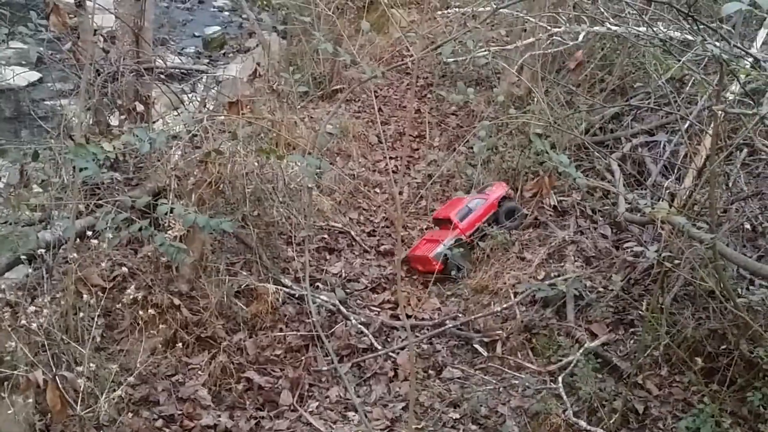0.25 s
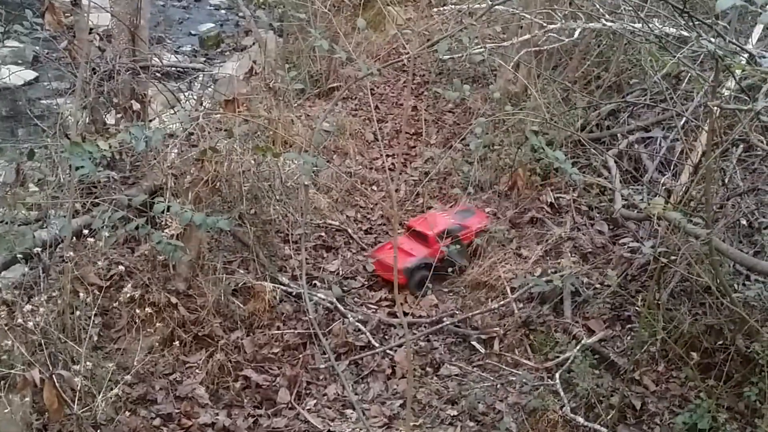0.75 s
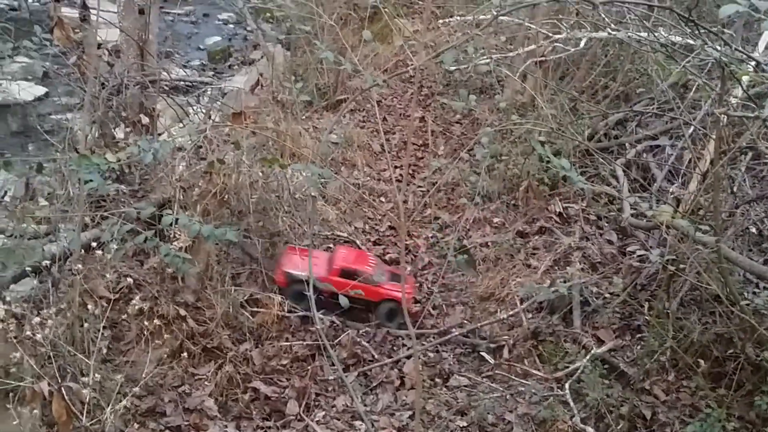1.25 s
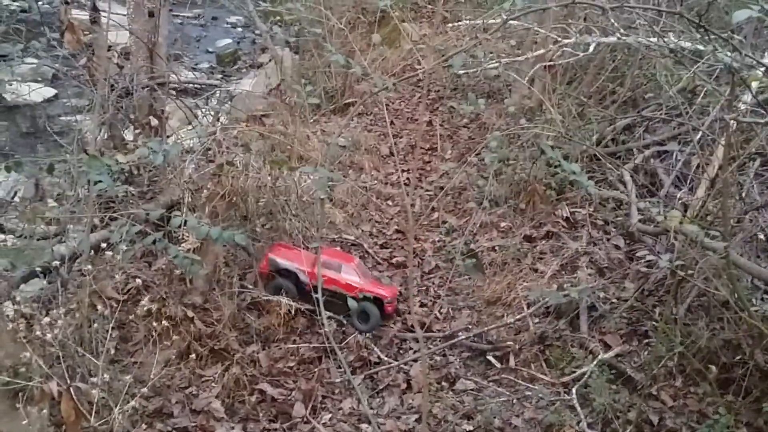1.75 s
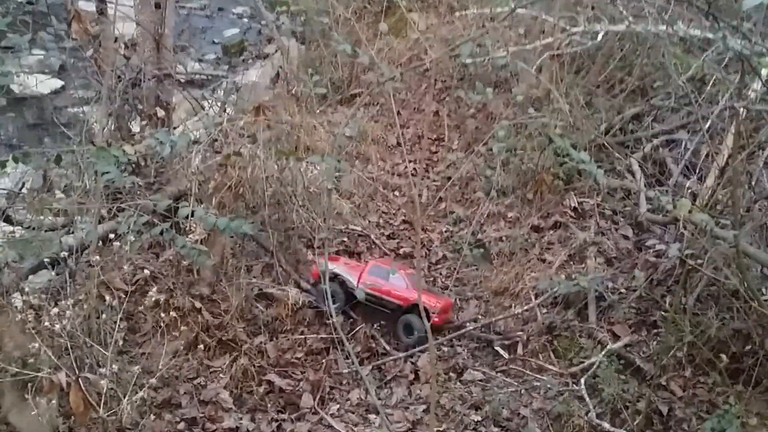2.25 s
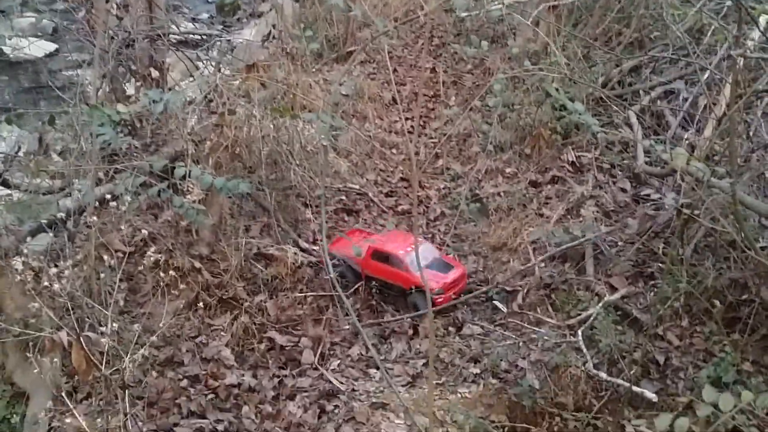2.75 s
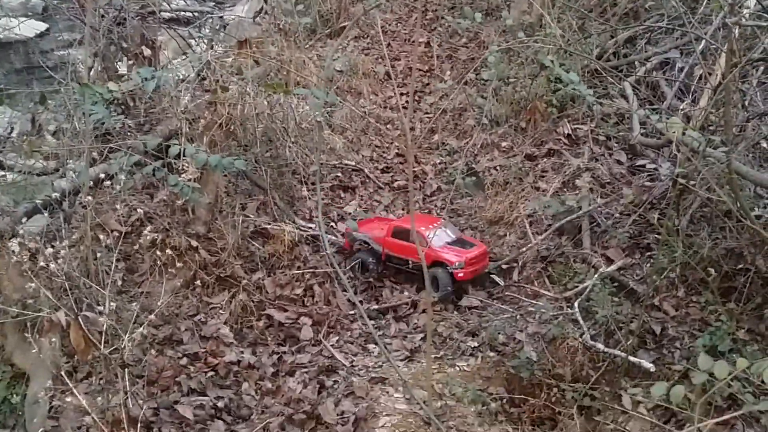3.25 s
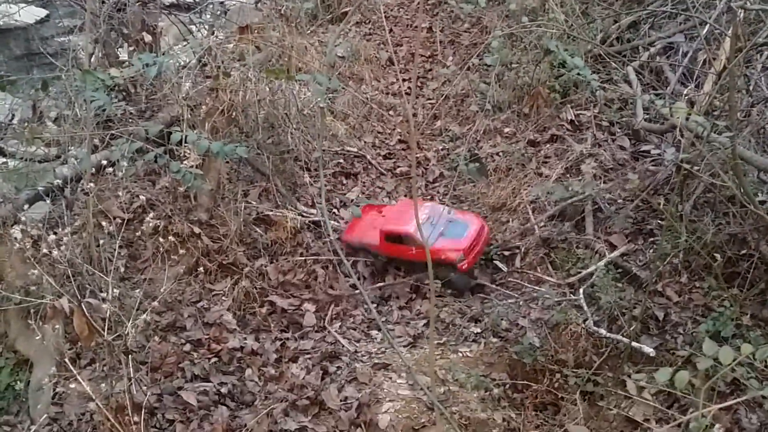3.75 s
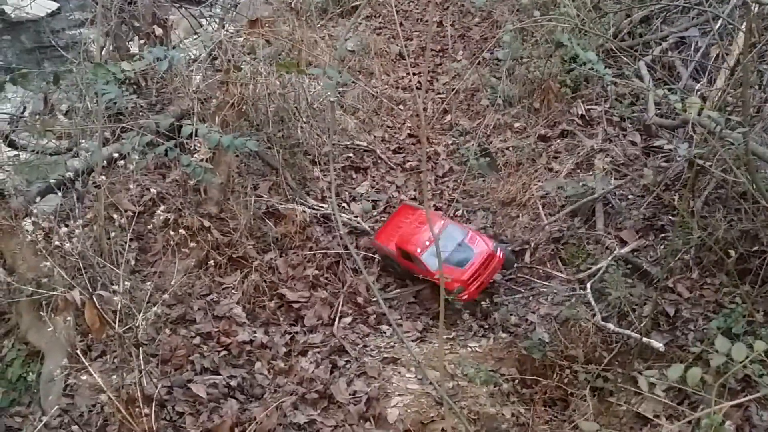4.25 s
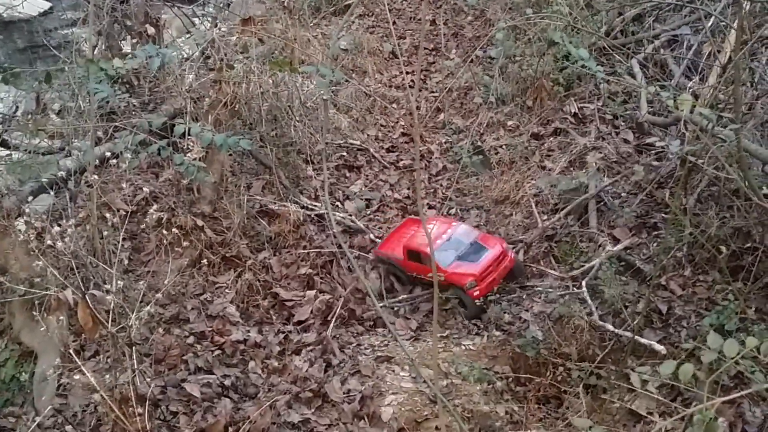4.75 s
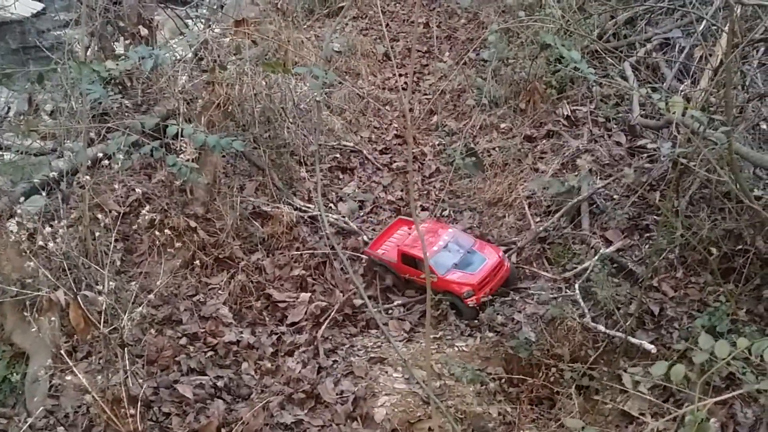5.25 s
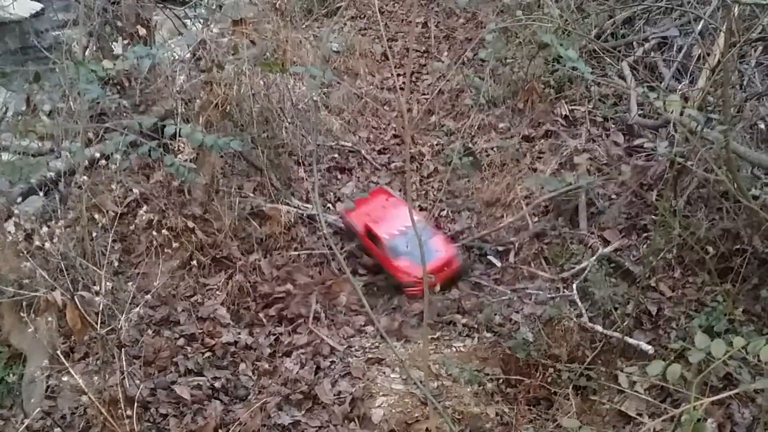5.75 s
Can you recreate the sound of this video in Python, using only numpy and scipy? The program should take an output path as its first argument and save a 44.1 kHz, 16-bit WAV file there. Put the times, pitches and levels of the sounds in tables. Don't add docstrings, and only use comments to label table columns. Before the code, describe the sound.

Bursts of brittle leaf crunch start and stop as a toy truck pulls, pauses and pulls again. Its gears whine upward early on and shriek briefly later. Twigs break with bright dry cracks, sticks knock woodily, and rubber treads stutter against the hollow shell, which booms low. Close, dry stereo pickup in open woodland, with very quiet distant traffic and stream hiss beneath, and the busiest jolts at the end.

```python
import sys
import numpy as np
from scipy import signal
from scipy.fft import rfft, irfft
from scipy.io import wavfile

SR = 44100
rng = np.random.default_rng(int(sys.argv[2]) if len(sys.argv) > 2 else 0)


def nominal_scale(level):
    x = np.asarray(level, float) / 20
    return 10 ** x


def file_out(sig):
    cols = np.atleast_2d(sig).T
    lim = np.clip(cols, -1, 1)
    pcm = np.round(lim * 32767).astype(np.int16)
    wavfile.write(sys.argv[1], SR, pcm)


N = 264589
SNAP_RISE_S = 0.00015


def rms_one(x):
    return x / np.sqrt(np.mean(x ** 2) + 1e-20)


def at_hz(points, hz):
    table_hz, values = np.array(points)[:, 0], np.array(points)[:, 1]
    return np.interp(np.log(hz), np.log(table_hz), values)


def cut(x, hz, kind):
    return signal.sosfilt(signal.butter(2, hz, kind, fs=SR, output="sos"), x)


def drift(rate_hz):
    r = np.exp(-80 * np.pi * rate_hz / SR)
    slow = signal.lfilter([1], [1, -2 * r, r * r], rng.standard_normal(N // 40 + 2002))[2000:]
    return np.interp(np.arange(N) / 40, np.arange(len(slow)), rms_one(slow))


def ring(clicks, hz, t60_s):
    r, w = nominal_scale(-60 / (t60_s * SR)), 2 * np.pi * hz / SR
    return signal.lfilter([0, np.sin(w)], [1, -2 * r * np.cos(w), r * r], clicks + 1e-18)


def peaking(x, lifts):
    for hz, width_hz, db in lifts:
        w, a = 2 * np.pi * hz / SR, nominal_scale(db / 2)
        k = np.sin(w) * width_hz / hz / 2
        x = signal.lfilter([1 + k * a, -2 * np.cos(w), 1 - k * a],
                           [1 + k / a, -2 * np.cos(w), 1 - k / a], x)
    return x


def grains(per_s, spread_db, clump_db):
    sizes = nominal_scale(spread_db * np.minimum(rng.exponential(1, N), 4)) * rng.choice([-1, 1], N)
    starts = rng.exponential(1, N) * (rng.random(N) < 110 / SR)
    fading = signal.lfilter([1], [1, -np.exp(-1 / (0.009 * SR))], starts)
    return sizes * nominal_scale(clump_db * np.minimum(fading, 2)) * (rng.random(N) < per_s / SR)


def strike(clicks, modes, patchy_db):
    dealt = rng.integers(0, len(modes), (3, N))
    total = np.zeros((3, N))
    for k, (hz, db, t60_s) in enumerate(modes):
        flare = nominal_scale(db + patchy_db * drift(17))
        total += ring(flare * clicks * (dealt == k), hz, t60_s)
    return rms_one(total)


def contact(length_s, rise_s, count):
    t = np.arange(1500) / SR
    ragged = rng.exponential(1, (count, 1, len(t) // 30)).repeat(30, axis=2)
    fade = np.exp(-t / length_s) + 0.1 * ragged * np.exp(-t / 0.008)
    slips = rng.standard_normal((count, 3, len(t))) * fade * (1 - np.exp(-t / rise_s))
    return slips / np.sqrt(np.sum(slips ** 2, axis=2, keepdims=True))


def add(track, start_s, sound):
    i = round(start_s * SR)
    track[:, i:i + sound.shape[1]] += sound[:, :N - i]


def pair(versions, lag, own_db, own_above_hz):
    shared, own = versions[0], versions[1:]
    direct = np.array([shared, np.interp(np.arange(N) - lag, np.arange(N), shared)])
    return direct + nominal_scale(own_db) * signal.lfilter(*signal.butter(1, own_above_hz, "high", fs=SR), own)


def woods():
    # hz, density_db (per Hz)
    floor = [(22, -33), (40, -24), (70, 0.5), (110, -0.5), (200, -13.5), (400, -26), (1000, -27),
             (1800, -56), (4000, -47), (9000, -40), (15000, -27.5)]
    hz = np.maximum(np.arange(N // 2 + 1) * SR / N, 1)
    mid, side = rfft(rng.standard_normal((2, N)), axis=1) * nominal_scale(at_hz(floor, hz))
    alike = 0.83 / (1 + (hz / 1600) ** 2) / (1 + (18 / hz) ** 2)
    both = np.sqrt(1 + alike) * mid + np.sqrt(1 - alike) * side * [[1], [-1]]
    both *= nominal_scale([[1.5], [-1.5]])
    return nominal_scale(-48) * rms_one(irfft(both, N, axis=1))


def motor():
    # start_s, mesh_hz, level_db
    pulls = [
        [(.46, 582, -49), (.575, 915, -49), (.67, 1210, -39), (.78, 1640, -40), (.805, 1950, -35),
         (.85, 2110, -49.5), (.9, 2750, -35.5), (.935, 2690, -40)],
        [(1.08, 2610, -32), (1.14, 2650, -44.5), (1.19, 2800, -37), (1.22, 2596, -34), (1.26, 2410, -47),
         (1.33, 2430, -51)],
        [(4.525, 4750, -31), (4.555, 5220, -32)],
        [(4.628, 4900, -23), (4.643, 5110, -22), (4.66, 4950, -33)],
        [(5.15, 2510, -37), (5.185, 2590, -40), (5.21, 2750, -43), (5.24, 2820, -38), (5.285, 2730, -40),
         (5.32, 2620, -57)],
        [(5.03, 705, -34), (5.06, 1055, -34.5), (5.09, 1350, -42)],
        [(5.06, 2700, -39), (5.085, 3070, -32), (5.12, 3200, -36)],
        [(5.33, 1470, -46), (5.37, 1033, -42.5), (5.4, 646, -40)],
        [(1.12, 4550, -40), (1.17, 4460, -32), (1.19, 4430, -36)],
        [(5.475, 827, -32), (5.515, 860, -42.5), (5.545, 1050, -41)],
    ]
    # mode_hz, width_hz
    cover = [(620, 180), (910, 370), (1225, 46), (1640, 86), (2000, 340), (2420, 120), (2700, 780),
             (4070, 130), (4460, 200), (5000, 190)]
    octave_db, off_mode_db = -2, -18
    out = np.zeros((3, N))
    waver, flicker = 1 + 0.014 * drift(80), nominal_scale(5 * drift(45) - 3)
    for s, hz, db in map(np.transpose, pulls):
        on = np.arange(round(s[0] * SR), round(s[-1] * SR))
        t = on / SR
        ends = np.clip(np.minimum(t - s[0], s[-1] - t) / 0.013, 0, 1)
        level = nominal_scale(np.interp(t, s, db)) * ends * flicker[on]
        hz = np.interp(t, s, hz)
        for k, share_db in enumerate([0, octave_db if hz.max() > 1500 else -40], 1):
            near = sum(1 / (1 + (2 * (k * hz - mode_hz) / width_hz) ** 2) ** 2 for mode_hz, width_hz in cover)
            turns = k * np.cumsum(hz * waver[on]) / SR
            out[0, on] += nominal_scale(share_db) * level * (near + nominal_scale(off_mode_db)) * np.sin(2 * np.pi * turns)
    hum_hz, hum_width_hz, hum_db = 990, 40, -60
    out[0] += nominal_scale(hum_db) * rms_one(ring(rng.standard_normal(N), hum_hz, 2.2 / hum_width_hz))
    return out


def chassis(rattle_db):
    # mode_hz, level_db, t60_s
    frame_modes = [(557, 4, 0.011), (948, 6, 0.008), (1272, 4, 0.01), (1633, -3, 0.037),
                   (2170, -3.5, 0.0055), (2680, 0.5, 0.019)]
    taps = grains(1500, spread_db=-0.5, clump_db=1.5)
    return nominal_scale(rattle_db - 3.5) * strike(taps, frame_modes, patchy_db=-2)


def shell(boom_db):
    # mode_hz, level_db, t60_s
    shell_modes = [(187, -13, 0.1), (246, 6, 0.038), (310, -9.5, 0.088), (517, -5.5, 0.027)]
    # start_s, peak_db, ring_hz
    bumps = [(0.107, -30, 231), (0.18, -29, 213), (0.627, -18, 249), (0.76, -20, 233), (0.858, -16, 257.5),
             (1.132, -16, 270), (1.67, -24, 171), (1.711, -46, 238), (1.764, -16.5, 162),
             (2.032, -18.5, 247), (2.088, -23, 257), (2.927, -15.5, 283), (3.022, -13.5, 272),
             (3.036, -20, 278), (1.811, -17.5, 282), (3.607, -35, 310), (3.732, -20.5, 276),
             (3.839, -15.5, 219), (3.92, -14, 214), (3.978, -13, 229), (4.472, -16, 252),
             (4.654, -11.5, 227), (4.52, -19, 240), (5.32, -24, 245), (5.349, -15.5, 255),
             (5.522, -12, 255), (5.562, -6, 249), (5.72, -8, 248), (5.844, -15.5, 250), (4.576, -21, 244),
             (4.869, -30, 288), (4.978, -33, 288), (5.625, -20, 235), (5.898, -22, 244),
             (2.341, -23.5, 266), (1.05, -21.5, 253)]
    shake_top_db = -39
    tread = strike(grains(1300, spread_db=3.5, clump_db=1.6), shell_modes, patchy_db=0.5)
    out = nominal_scale(np.minimum(boom_db + 1.35, shake_top_db)) * tread
    t = np.arange(6000) / SR
    swell = (1 - np.exp(-t / 0.0031)) * np.exp(-t / 0.028)
    for (s, db, hz), turn in zip(bumps, rng.random((len(bumps), 3, 1))):
        add(out, s - 0.003, nominal_scale(db - 11.5) * swell * np.sin(2 * np.pi * (hz * t + turn)))
    return cut(out, 59, "high")


def slaps():
    # start_s, peak_db, ring_hz
    hits = [(1.77, -23, 290), (3.397, -29, 332), (3.484, -33, 330), (5.579, -17, 258), (1.811, -35, 280),
            (2.954, -20, 286), (2.975, -22, 285), (3.044, -21, 276), (3.087, -28, 280), (5.601, -25, 260),
            (4.578, -23.5, 250), (4.688, -24, 260), (5.678, -27, 474), (5.701, -22, 260), (5.718, -15, 256),
            (5.774, -33, 248), (5.8003, -16, 266), (5.817, -26, 333), (5.827, -15, 277),
            (5.852, -20.5, 249), (5.877, -26, 260)]
    out, t = np.zeros((3, N)), np.arange(1500) / SR
    for s, db, hz in hits:
        wave = np.sin(2 * np.pi * hz * t + 0.1 * np.sin(4 * np.pi * hz * t))
        add(out, s, nominal_scale(db - 0.5) * np.exp(-t / 0.0051) * wave * np.ones((3, 1)))
    return out


def knocks():
    # start_s, peak_db, strongest_ring_hz, boom_share_db
    lugs = [(0.105, -15, 2170, -22), (0.1346, -14.5, 1780, -6), (0.181, -15.5, 2300, -4),
            (1.011, -38, 2680, -27), (1.032, -18.5, 2680, -24), (1.7578, -13, 2750, -3),
            (2.0352, -19, 2780, 9), (2.9261, -7, 2040, -28), (2.951, -6, 1800, -8), (2.9689, -8, 2040, -8),
            (2.9925, -14, 2000, -11), (3.015, -6, 1930, -24), (3.044, -8, 2170, -3),
            (3.088, -7.5, 2010, -16), (3.3945, -9.5, 1700, -4), (3.481, -8.5, 2050, -6),
            (3.5279, -47, 2120, -7), (3.543, -15.5, 1800, -6), (3.575, -8, 1990, -26),
            (3.603, -5.5, 1970, -27), (3.6362, -11, 2080, -12), (3.663, -8, 1820, -19),
            (3.681, -7.5, 1780, -5.5), (3.835, -7, 2100, -12), (3.908, -14.5, 2490, -2),
            (5.59, -17, 2530, -15), (5.8182, -9.5, 1230, -9)]
    # mode_hz, level_db, t60_s
    panel = [(527, -8, .02), (900, -7, .026), (1265, -8, .024), (1730, -2, .016), (2165, 0, .015),
             (3700, -6, .007), (4500, -4, .006)]
    rise_s = 0.0007
    out = np.zeros((3, N))
    slips = contact(0.0014, rise_s, count=len(lugs))
    lucks_db = rng.normal(0, 1.5, (len(lugs), len(panel)))
    for (s, db, own_hz, boom_db), slip, luck_db in zip(lugs, slips, lucks_db):
        slip = cut(slip, [400, 2500], "band") + 0.45 * slip
        sound = ring(slip, own_hz, 0.014)
        for (hz, mode_db, t60_s), dice_db in zip(panel, luck_db):
            low_db = boom_db + 7 if hz < 1400 else 0
            sound += nominal_scale(mode_db + dice_db + low_db) * ring(slip, hz, t60_s)
        add(out, s - rise_s / 2, nominal_scale(db - 5) * sound / np.max(np.abs(sound[0])))
    return out


def sticks():
    # start_s, peak_db
    hits = [(1.2229, -13), (1.366, -16), (1.389, -25), (2.342, -20), (2.902, -15), (3.807, -17),
            (3.916, -12), (4.472, -16), (4.669, -4), (5.756, -3), (5.8005, -15), (5.826, -9)]
    out = np.zeros((3, N))
    for (s, db), slip in zip(hits, contact(0.0008, SNAP_RISE_S, count=len(hits))):
        wood = ring(slip, 520, 0.0061) + 0.78 * ring(slip, 860, 0.014) + 0.4 * ring(slip, 1280, 0.0097)
        add(out, s, nominal_scale(db - 9.5) * wood)
    return out


def crushes():
    # start_s, dying_s, level_db
    branches = [
        (0.105, 0.006, -27.5),
        (0.178, 0.018, -36),
        (1.773, 0.02, -26),
        (2.034, 0.019, -21.5),
        (3.836, 0.018, -22),
        (4.654, 0.043, -25),
        (4.73, 0.02, -25),
        (5.816, 0.014, -34),
    ]
    out, t = np.zeros((3, N)), np.arange(3000) / SR
    ragged = np.sqrt(rng.exponential(1, (len(branches), 1, 75))).repeat(40, axis=2)
    runs = ragged * rng.standard_normal((len(branches), 3, len(t)))
    for (s, dying_s, db), splinters in zip(branches, runs):
        add(out, s, nominal_scale(db) * np.exp(-t / dying_s) * rms_one(cut(splinters, [280, 3200], "band")))
    return out


def snaps():
    # start_s, peak_db, ring_hz
    twigs = [(0.18, -20, 4450), (1.2664, -16, 6400), (1.35, -10.5, 6080), (1.382, -12, 5750),
             (1.724, -27, 3630), (1.7555, -4, 4900), (1.7576, -3.5, 3500), (1.7325, -10, 3600),
             (1.765, -18, 4400), (1.814, -16, 5800), (1.779, -19, 5490), (1.988, -16, 3650),
             (2.036, -8, 5340), (2.326, -14, 5600), (2.4617, -11.5, 7440), (3.0458, -11, 4500),
             (3.0887, -8, 3460), (3.368, -20, 7250), (3.482, -12, 4340), (3.499, -13, 3550),
             (3.573, -8, 4200), (3.827, -8.5, 3740), (4.0093, -16, 3650), (3.8357, -9, 3300),
             (4.2132, -28, 3720), (4.3333, -19, 5200), (4.383, -18, 4500), (5.5202, -17, 5800),
             (5.753, -21, 5040), (5.781, -2, 5700), (5.872, -15, 5230), (5.97, -13, 3900)]
    # start_s, peak_db, ring_hz
    more_twigs = [(0.0724, -21, 5040), (0.2014, -34, 4620), (0.3077, -20, 3200), (0.357, -29, 5300),
                  (0.4445, -23.5, 4640), (0.5564, -28, 7100), (0.6137, -11, 4800), (0.809, -13, 7240),
                  (0.8504, -20, 5400), (0.8624, -10.5, 5500), (0.942, -32, 4340), (1.194, -17, 4460),
                  (1.2415, -13, 5760), (1.277, -15, 5070), (1.3663, -13, 5200), (1.3994, -9, 5610),
                  (1.4536, -32, 5490), (1.5318, -25, 3800), (1.5494, -21, 7000), (1.6542, -16, 5450),
                  (1.6894, -12, 5630), (2.2078, -20, 4880), (2.2902, -12, 5100), (2.2928, -11, 5280),
                  (2.4924, -16.5, 5570), (2.6808, -20, 5100), (2.8238, -11, 3760), (3.02, -10.5, 3840),
                  (3.3384, -21, 6660), (3.3941, -21, 3640), (3.513, -19, 3380), (3.6422, -12, 4050),
                  (3.665, -9, 4780), (3.6914, -8, 4900), (3.7014, -17, 3670), (3.886, -12, 3620),
                  (4.0494, -14, 4830), (4.207, -28, 3560), (4.235, -28, 3800), (4.3144, -35, 4840),
                  (4.5914, -13, 4000), (4.8544, -20.5, 4910), (4.9164, -24, 5430), (5.1874, -24, 5140),
                  (5.4905, -16, 4260), (5.794, -14, 4900), (5.8823, -16, 4860)]
    # start_s, peak_db, ring_hz, brightness_db
    flicks = [(0.1045, -12, 3700, -15), (.1346, -19, 3660, -14), (0.2246, -21, 4430, -2),
              (0.4627, -31.5, 7280, 14), (0.5353, -12, 9190, -4), (0.581, -16, 8150, -23),
              (0.5954, -16, 4000, -32), (.857, -22, 4460, -17), (0.999, -13.5, 3570, -5.5),
              (1.5677, -18, 7200, -7), (2.041, -11, 5600, -6), (2.0476, -25, 4770, -14),
              (2.0837, -11, 4400, -4.5), (2.2276, -15, 4570, -16), (2.4094, -23, 5500, -18),
              (3.605, -2.5, 4100, -13), (3.8763, -2, 4050, -15), (3.904, -12, 3960, -12),
              (3.9438, -12, 4200, -10), (4.0872, -12, 3650, -4.5), (4.1086, -11.5, 5800, -8),
              (4.13, -9, 5800, -11), (4.197, -9.5, 4260, -10), (4.2247, -16, 3950, -36),
              (4.3946, -17, 5540, -18), (4.4283, -22, 4160, -18), (4.4527, -13, 4440, -16),
              (5.015, -24, 5200, -19), (5.081, -14, 4740, -19), (5.478, -27.5, 4160, -15),
              (5.8168, -3, 4900, -13.5), (.328, -20.5, 3600, -7)]
    twig_bright_db = -26
    breaks = [(*row, twig_bright_db) for row in [*twigs, *more_twigs]] + list(flicks)
    out = np.zeros((3, N))
    for (s, db, hz, bright_db), crack in zip(breaks, contact(0.0008, SNAP_RISE_S, count=len(breaks))):
        wood = ring(crack, hz, 0.0018) + 2.4 * cut(crack, [2200, 8000], "band")
        tick = nominal_scale(bright_db + 21) * cut(crack, 8500, "high")
        add(out, s, nominal_scale(db - 7.5) * (wood + tick) / np.max(np.abs(wood), axis=1, keepdims=True))
    return out


def tears():
    # start_s, length_s, level_db, pitch_hz
    torn = [(0.216, 0.011, -39, 4400), (0.554, 0.0093, -26, 10200), (0.576, .008, -28, 7700),
            (0.941, 0.0088, -30, 10800), (1.185, 0.022, -33.5, 6000), (1.264, 0.014, -25.5, 5740),
            (1.387, 0.0087, -29, 5600), (1.654, 0.02, -28, 5470), (1.724, 0.0077, -24.5, 3500),
            (1.902, 0.019, -30.5, 5540), (1.926, 0.0099, -32, 3800), (1.947, 0.011, -33, 7000),
            (1.982, .01, -30, 3720), (2.315, 0.03, -34, 5530), (2.455, 0.017, -31, 5770),
            (2.798, 0.034, -33, 4670), (3.69, 0.012, -37, 3800), (3.881, 0.016, -24.5, 4200),
            (3.922, 0.019, -25.5, 3840), (4.571, 0.021, -28, 3740), (5.656, 0.0062, -34, 4900),
            (5.786, 0.009, -20.5, 5330), (5.874, 0.028, -30, 5250)]
    out, t = np.zeros((3, N)), np.arange(2500) / SR
    for (s, length_s, db, hz), rips in zip(torn, rng.laplace(size=(len(torn), 3, len(t)))):
        shape = (1 - np.exp(-t / 0.003)) / (1 + (t / length_s) ** 4)
        add(out, s, nominal_scale(db) * shape * rms_one(ring(rips, hz, 17 / hz)))
    return pair(out, 3.94, own_db=-15, own_above_hz=3700)


def leaves(crunch_db, bright_db):
    # ring_hz, grain_size_db
    leaf = [(1500, -11), (2600, -12), (3600, -1.5), (5500, 1.5), (8000, -8.5)]
    cracks = grains(14000, spread_db=2.3, clump_db=1.9)
    modes = [(hz, at_hz(leaf, hz), 19 / hz) for hz in np.geomspace(1500, 8500, 20)]
    dull = strike(cracks, modes, patchy_db=2.2)
    ticks = cracks * rng.choice([-1, 1], (3, N)) * [[0.5], [1], [1]]
    fine = rms_one(cut(cut(ticks, 6650, "high"), 10160, "high"))
    both = pair(dull + nominal_scale(bright_db + 13) * fine, 3.67, own_db=1.89, own_above_hz=830)
    return nominal_scale(crunch_db - 10.5) * both


def drive():
    # start_s, hold_s, leaf_crunch_db, frame_load_db
    bites = [(0.0, 0.17, -36, -9), (0.23, 0.52, -38, -15.5), (0.565, 0.2, -29, -14),
             (0.78, 0.15, -28, -11.5), (1.019, 0.2, -25.5, -8), (1.214, 0.087, -27, -14),
             (1.345, 0.11, -28, -10), (1.54, 0.029, -37.5, -16), (1.647, 0.026, -29, -17),
             (1.704, 0.018, -27.5, -6), (1.88, 0.11, -28, -14.5), (2.034, 0.12, -30.5, -5.5),
             (2.247, 0.13, -28, -13.5), (2.434, 0.38, -28.5, -12.5), (2.715, 0.18, -27, -16),
             (2.898, 0.26, -29, -9.5), (3.23, 0.071, -35.5, -16.5), (3.403, 0.14, -30.5, -10),
             (3.602, 0.14, -25.5, -6.5), (3.803, 0.2, -27, -5.5), (3.896, 0.12, -24, -24),
             (2.166, 0.037, -41, -7.5), (1.771, 0.036, -27, -5.5), (4.018, 0.14, -33.5, -13),
             (4.21, 0.17, -37.5, -14), (4.485, 0.14, -24, -12.5), (4.586, 0.12, -23.5, -9.5),
             (4.736, 0.068, -23.5, -15), (4.836, 0.02, -34.5, -7), (4.906, 0.039, -48.5, -3.5),
             (5.034, 0.014, -47, -7), (1.27, 0.013, -30, -20.5), (5.808, 0.025, -27.5, 0),
             (3.3, 0.039, -37.5, -11.5), (5.082, 0.16, -26, -13), (5.243, 0.11, -30, -5),
             (5.564, 0.054, -25, -4.5), (5.665, 0.093, -19, -6), (5.874, 0.046, -29.5, -9),
             (5.962, 0.04, -35, -6)]
    rise_db_per_s, fall_db_per_s = 189, 201
    frame_quicker, shell_quicker = 1.2, 2.2
    shell_db, shell_per_load = 3, 1.82
    tick_db, dulling = -7, 0.013
    s, hold_s, db, load_db = np.transpose(bites)[:, :, None]
    t = np.arange(0, N + 64, 64) / SR
    away_db = rise_db_per_s * np.maximum(s - t, 0) + fall_db_per_s * np.maximum(t - s - hold_s, 0)

    def total_db(each_db):
        power = np.sum(nominal_scale(each_db) ** 2, axis=0)
        return np.interp(np.arange(N) / SR, t, 10 * np.log10(power))

    crunch_db = total_db(db - away_db)
    rattle_db = total_db(db + load_db - frame_quicker * away_db)
    boom_db = total_db(db + shell_db + shell_per_load * load_db - shell_quicker * away_db)
    bright_db = tick_db - dulling * (np.maximum(crunch_db, -42) + 30)
    return crunch_db, bright_db, rattle_db, boom_db


def ground(x):
    # [(dip_hz, width_hz, level_db)]
    poses = [
        (0, [(714, 280, -2.5), (1500, 440, -6.5), (3060, 400, 3)]),
        (1.1, [(670, 130, -3.5), (1590, 370, -8.5), (3150, 790, -3.5)]),
        (2.1, [(690, 110, -6.5), (1590, 330, -12), (420, 130, 0)]),
        (3.4, [(750, 100, -4.5), (1560, 540, -8), (420, 120, 1.5)]),
        (4.1, [(730, 150, -2), (1760, 630, -10), (420, 130, -0.5)]),
    ]
    turn_s = 0.15
    t = np.arange(N) / SR
    begun = [1] + [np.clip((t - s) / turn_s + 0.5, 0, 1) for s, _ in poses[1:]] + [0]
    return sum((begun[k] - begun[k + 1]) * peaking(x, dips) for k, (_, dips) in enumerate(poses))


def scene():
    # start_s, extra_dryness_db, lean_to_left_db
    path = [(0, -1, 0.5), (.35, 0.5, 2), (.56, 2, 1.5), (.75, 2, 2), (1.0, -0.5, 2), (1.3, 1, 0.5),
            (1.549, -3.5, -0.5), (2.0, -0.5, -.5), (2.5, 0.5, 0.5), (2.95, -3, -2), (3.3, 2, 3),
            (3.6, 1, -0.5), (3.9, -2.5, -1.5), (4.3, -1, 0), (4.7, -2, -1.5), (5.2, -2.5, -1),
            (5.6, -1.5, 1), (6, -0.5, -1)]
    # centre_hz, width_hz, level_db
    treble_dip = [(14140, 5500, -4)]
    crunch_db, bright_db, rattle_db, boom_db = drive()
    truck = chassis(rattle_db) + shell(boom_db) + slaps() + knocks() + sticks() + motor() + crushes()
    body = pair(cut(truck, 95, "high"), 4.2, own_db=-4, own_above_hz=800)
    twigs = pair(snaps(), 3.5, own_db=-1, own_above_hz=3000)
    s, dry_db, lean_db = np.transpose(path)
    dry_db, lean_db = (np.interp(np.arange(N) / SR, s, v) for v in (dry_db, lean_db))
    litter = leaves(crunch_db, bright_db + dry_db) * nominal_scale(lean_db * [[0.5], [-0.5]])
    return peaking(ground(litter + body + twigs + woods() + tears()), treble_dip)


def low_pass(x):
    return signal.sosfilt(signal.butter(12, 15480, fs=SR, output="sos"), x)


def record(dry):
    # centre_hz, width_hz, lift_db
    left_port = [(1640, 1300, 4.5), (6936, 2600, 16)]
    right_port = [(3650, 440, 5), (4900, 3000, 11), (13340, 3700, -15)]
    x = np.array([nominal_scale(-2) * peaking(dry[0], left_port), nominal_scale(3.5) * peaking(dry[1], right_port)])
    x = cut(0.8 * np.tanh(x / 0.8), 35, "high")
    x = signal.sosfilt(signal.cheby2(16, 62, 14850, fs=SR, output="sos"), x)
    return low_pass(x)


dry = scene()
out = record(dry)
file_out(out)
```